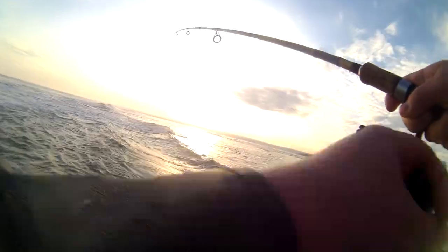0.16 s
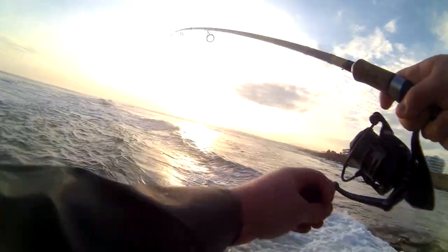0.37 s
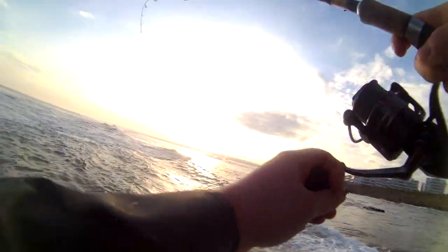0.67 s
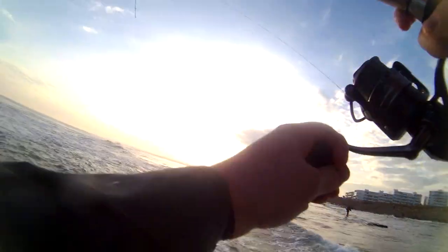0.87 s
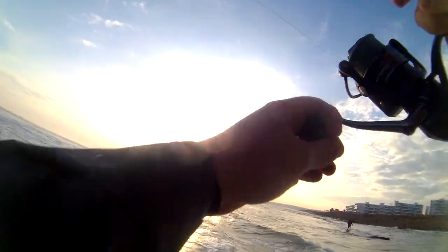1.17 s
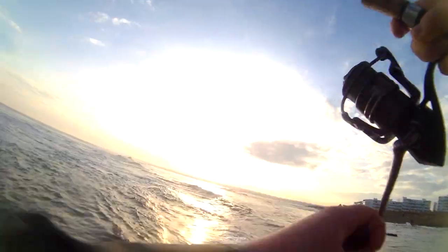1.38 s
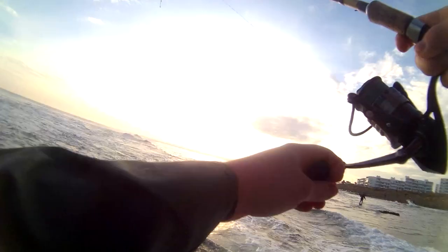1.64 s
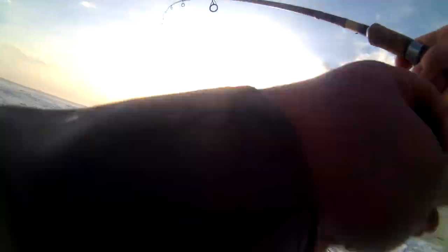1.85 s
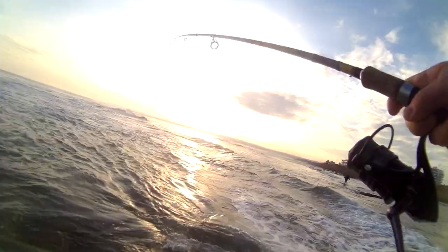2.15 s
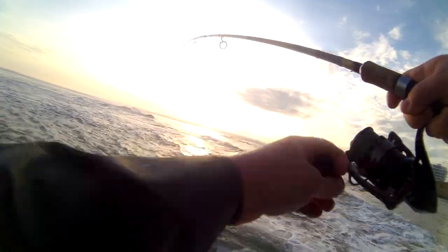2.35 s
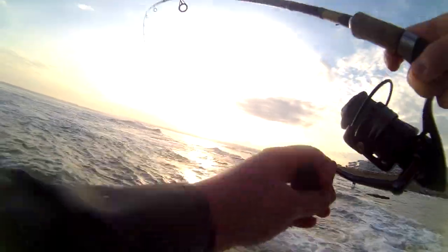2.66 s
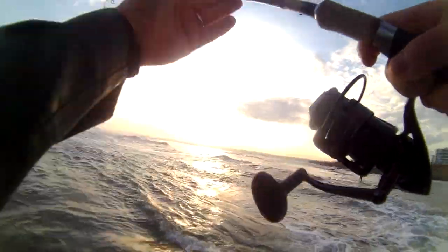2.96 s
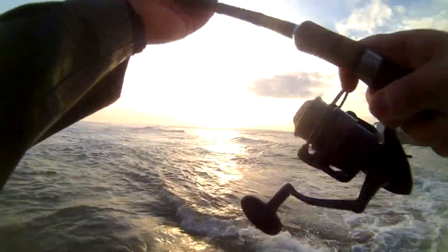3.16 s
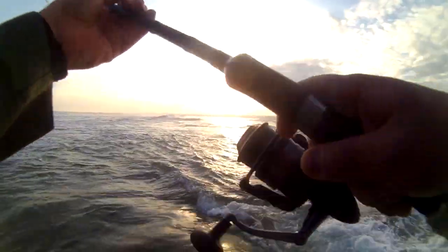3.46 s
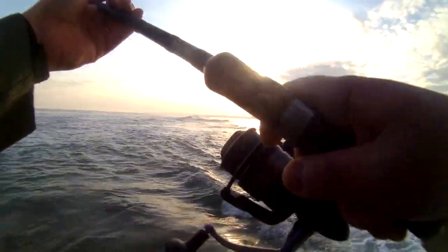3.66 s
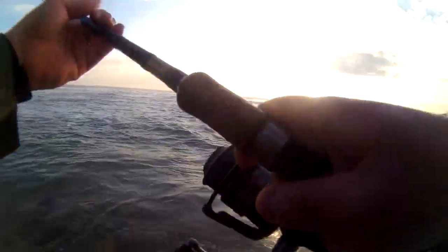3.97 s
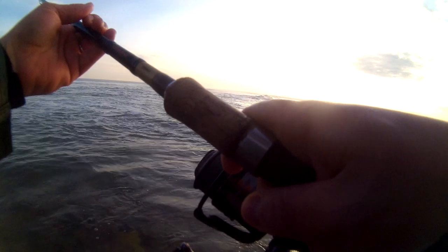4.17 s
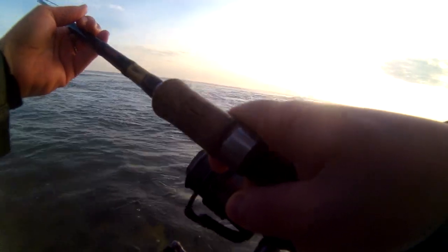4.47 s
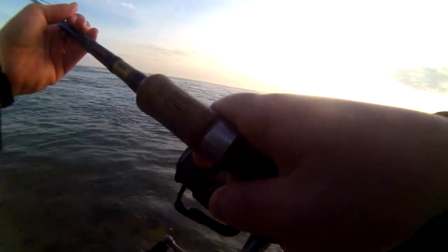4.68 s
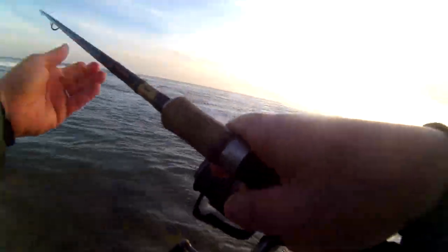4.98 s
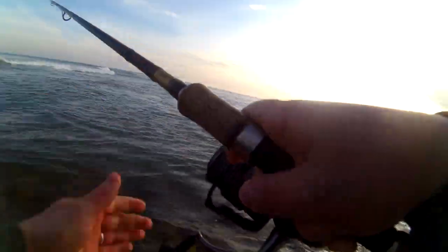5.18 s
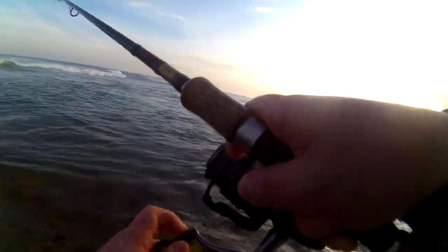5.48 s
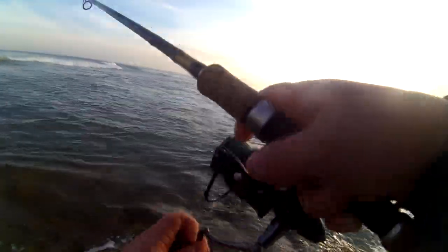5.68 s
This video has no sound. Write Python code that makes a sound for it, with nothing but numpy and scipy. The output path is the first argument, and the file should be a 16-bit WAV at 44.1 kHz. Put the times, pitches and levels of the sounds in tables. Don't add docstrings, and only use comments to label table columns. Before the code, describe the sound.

Surf washes continuously around an angler on the shore, heard from inside a small waterproof case that makes it hollow and midrange-heavy. Low wind bumps, small dull slaps and faint reel ticks come irregularly. The water thins around two seconds, swells again, then one very loud, short knock hits the case at 3.5 seconds and the sound dips briefly. The wash continues, weaker near five seconds. Soft hiss and a very faint high whine persist.

```python
import sys
import numpy as np
from scipy import signal
from scipy.fft import rfft, irfft, next_fast_len
from scipy.io import wavfile
from scipy.ndimage import uniform_filter1d, map_coordinates

SR = 44100
rng = np.random.default_rng(int(sys.argv[2]) if len(sys.argv) > 2 else 0)


def put_to_file(sound):
    columns = np.atleast_2d(sound).T
    safe = np.clip(columns, -1, 1)
    whole_steps = np.round(safe * 32767)
    wavfile.write(sys.argv[1], SR, whole_steps.astype(np.int16))


def volts(x):
    e = np.asarray(x, float) / 20
    return 10 ** e


N = 257544
T = np.arange(N) / SR

# time in seconds, strength in dB, foam in dB, nearness in dB.
WASH = [(0.0, -42, 8, -1), (0.2, -42.5, 9, -1), (0.28, -43.5, 5, -0.5), (0.8, -44, 2.5, -1.5),
        (1.1, -47.5, -2, 1.5), (1.4, -46, -0.5, 3.5), (1.72, -47.5, 4, 1), (1.78, -47.5, -4, -2),
        (1.95, -52.5, -3.5, -3), (2.3, -53.5, -8.5, -2.5), (2.55, -50, -5.5, -1), (2.92, -49, 1, 1.5),
        (3.2, -50, 1.5, 1), (3.44, -45.5, 2, -0.5), (3.9, -46, -0.5, -1), (4.6, -47, -1, -1),
        (5.3, -52, -5, 1), (5.84, -48.5, -3, 3.5)]
# time in seconds, swell in dB, foam in dB.
SLOPS = [(0.17, 4.5, -1), (0.52, 1, 0), (1.2, -1, 2), (2.14, 1.5, 5.5), (2.4, 1, 4), (2.68, 0, 6),
         (3.32, 0, 3), (3.83, 3, -2.5), (4.1, -2, -0.5), (4.24, 1, 1), (5.14, 1, -3), (5.65, 2, 2.5)]
# frequency in Hz, level in dB.
ROAR_SPECTRUM = [(40, -120), (90, -7.5), (200, -6), (400, -6), (700, -8.5), (1000, -20.5), (2500, -120)]
CHURN_SPECTRUM = [(300, -120), (600, -14.5), (850, -3), (1350, -5.5), (1800, -33.5), (4000, -120)]
SPLASH_SPECTRUM = [(800, -120), (1300, -14), (1600, -1.5), (2000, -4.5), (2400, -19.5), (5000, -120)]
SPRAY_SPECTRUM = [(1000, -120), (1800, -8.5), (2300, 0), (3200, -6.5), (4500, -17), (5500, -17.5),
                  (9000, -120)]
FIZZ_SPECTRUM = [(2500, -120), (4400, -22), (5600, -1.5), (7000, -1), (9000, -7.5), (11500, -12),
                 (15000, -42)]
# centre in Hz, width in Hz, height in dB.
SHELL = [(970, 180, 2), (1040, 117, 5.5), (1246, 58, 3.5), (1495, 370, 3), (1808, 290, 7.5),
         (3330, 300, -9.5), (3920, 800, 13.5), (5000, 460, -1), (7740, 310, -10)]
# frequency in Hz, level in dB.
WIND_SPECTRUM = [(8, -13.5), (20, -7), (40, -12.5), (80, -23), (160, -49), (400, -120)]
# time in seconds, peak in dB, length in seconds.
GUSTS = [(0.08, -43, 0.057), (0.202, -44, 0.05), (0.3, -56, .08), (0.46, -48, 0.13), (0.71, -54, .05),
         (0.835, -44, 0.11), (1.003, -55, .15), (1.113, -47, 0.066), (1.215, -44.5, .12),
         (1.376, -47.5, .15), (1.572, -46, .07), (1.683, -51, 0.044), (1.77, -46, 0.12),
         (1.973, -42.5, 0.074), (2.1, -62, 0.15), (2.34, -46.5, 0.093), (2.533, -50.5, 0.13),
         (2.705, -47, .08), (2.973, -48, .12), (3.086, -46, 0.058), (3.257, -52, .12), (3.45, -50, .07),
         (3.737, -49, 0.053), (3.837, -45, 0.048), (4.206, -52, .15), (4.6, -62, .2), (4.95, -53, 0.16),
         (5.33, -47.5, 0.12), (5.533, -51, .12), (5.73, -48, 0.19)]
# frequency in Hz, level in dB.
HISS_SPECTRUM = [(1500, -27), (3000, -6), (7000, -9), (9500, -8), (12000, -10.5), (14000, -10),
                 (16000, -9.5)]
# start in seconds, crack level in dB, ping level in dB.
TICKS = [(.518, -70, -46), (.833, -70, -48), (1.15, -62, -48), (1.4475, -48, -56), (1.729, -60, -52),
         (1.7815, -53, -52), (3.467, -58, -70), (3.548, -60, -48), (3.685, -70, -47), (3.76, -70, -52),
         (4.2248, -50, -62), (4.358, -57, -51), (4.417, -60, -48), (4.5, -58, -70), (5.4395, -58, -47),
         (5.681, -56, -70), (5.76, -62, -70)]
# frequency in Hz, level in dB.
REEL_SPECTRUM = [(1000, -40), (3000, -12), (5500, 4), (7000, 0), (10000, -16), (14000, -50)]
# start in seconds, peak in dB, pitch in Hz.
SLAPS = [(0.539, -27.5, 1040), (0.61, -29, 1064), (0.63, -27.5, 1060), (0.655, -42, 1080),
         (1.324, -33, 1280), (1.434, -29, 1040), (1.693, -31, 980), (2.355, -35, 926), (2.709, -30, 960),
         (2.923, -32.5, 975), (3.081, -37, 1040), (3.309, -27, 904), (3.329, -29.5, 1025),
         (3.368, -32, 1020), (3.795, -36, 970), (3.904, -28, 1040), (4.348, -31, 910), (4.37, -30, 880),
         (4.387, -33, 890), (4.499, -32, 830), (4.566, -33, 890), (4.602, -39, 1040), (4.705, -35, 1040),
         (5.392, -35, 1080), (5.505, -44, 2280), (5.64, -30, 894)]
WALL_HZ = [1063, 1254, 1750, 2040, 2870, 3930, 4750, 6200, 7280]
# level in dB, 60 dB decay in seconds.
WALL_DECAY = [(-4.5, 0.016), (-5.5, 0.0095), (-20, 0.02), (-33, 0.027), (-24, 0.0095), (-23, 0.018),
              (-23.5, 0.0063), (-22.5, 0.0047), (-34.5, 0.01)]
WALL_SIGN = [1, -1, 1, -1, 1, -1, 1, 1, -1]
# pitch in Hz, level in dB, 60 dB decay in seconds.
BODY = [(47, -26, 0.093), (231, -5.5, 0.025), (453, -17.5, 0.023), (662, -12.5, 0.015)]
# start in seconds, end in seconds, gain in dB.
DUCK = (3.524, 3.679, -5)

MEAN_STRENGTH_DB = -48
PORT_HZ = 3930


def unit(x):
    return x / np.sqrt(np.mean(x ** 2) + 1e-20)


def curves(rows):
    s, *columns = np.transpose(rows)
    return [np.interp(T, s, column) for column in columns]


def wobble(rate_hz):
    knots = rng.standard_normal(int(N * rate_hz / SR) + 4)
    return map_coordinates(knots, [T * rate_hz])


def bumps(s, size, rise_s, fall_s):
    clock = T[::100]
    late = clock - np.c_[s]
    width_s = np.where(late < 0, np.c_[rise_s], np.c_[fall_s])
    bells = np.c_[size] * np.exp(-(late / width_s) ** 2)
    return np.interp(T, clock, np.sum(bells, axis=0))


def coloured(x, spectrum, shell=SHELL):
    m = 2 * next_fast_len(N // 2 + 4096)
    hz = np.fft.rfftfreq(m, 1 / SR)
    point_hz, point_db = np.transpose(spectrum)
    source_db = np.interp(np.log(hz + 1), np.log(point_hz), point_db)
    shell_db = sum(db / (1 + (2 * (hz - centre) / width) ** 2) for centre, width, db in shell)
    cepstrum = irfft(np.log(volts(source_db + shell_db)), m)
    cepstrum[1:m // 2] *= 2
    cepstrum[m // 2 + 1:] = 0
    return irfft(rfft(x, m) * np.exp(rfft(cepstrum)), m)[:N]


def patchy(patch_db, burst_db, burst_hz):
    z = signal.stft(rng.standard_normal(N + 512), nperseg=512)[2]
    field = uniform_filter1d(rng.standard_normal(z.shape), size=6, axis=0)
    field = uniform_filter1d(field, size=10, axis=1)
    noise = signal.istft(z * volts(patch_db * unit(field)), nperseg=512)[1][:N]
    return noise * volts(burst_db * wobble(burst_hz))


def ring(modes, length_s, attack_s):
    t = np.arange(round(length_s * SR)) / SR
    tones = sum(volts(db - 60 * t / t60) * np.sin(2 * np.pi * hz * t) for hz, db, t60 in modes)
    return tones * (1 - np.exp(-t / attack_s))


def add(track, s, sound):
    track[round(s * SR):][:len(sound)] += sound


def surf():
    strength_db, foam_db, near_db = curves(WASH)
    s, swell_db, froth_db = np.transpose(SLOPS)
    slop_s = [0.053]
    strength_db = strength_db - MEAN_STRENGTH_DB + bumps(s, swell_db, slop_s, slop_s)
    foam_db = foam_db + bumps(s, froth_db, slop_s, slop_s)
    tumble = volts(0.32 * wobble(15) + 0.44 * wobble(40))
    drops = unit((rng.random(N) < 700 / SR) * rng.standard_normal(N))

    def level(mean_db, per_strength, per_foam):
        return volts(mean_db + per_strength * strength_db + per_foam * foam_db)

    def water(noise, drop_share, spectrum):
        return unit(coloured(noise + drop_share * drops, spectrum))

    far_fade = volts(-0.56 * (T - T.mean()))
    roar = level(-50.5, 0.3, 0.085) * far_fade * water(patchy(0.88, 0.31, 14), 0.28, ROAR_SPECTRUM)
    churn = level(MEAN_STRENGTH_DB + 0.75, 1, 0) * water(patchy(0.38, 0.28, 15), 0.28, CHURN_SPECTRUM)
    splash = level(-52.5, 0.078, 0.65) * water(patchy(0.71, 0.45, 25), 0.48, SPLASH_SPECTRUM)
    splash = splash * volts(near_db)
    spray = level(-56.5, 0.77, 0.18) * water(patchy(0.94, 0.49, 24.82), 0.44, SPRAY_SPECTRUM)
    spray = spray * volts(0.3 * near_db)
    fizz = level(-65.5, 0.05, 1) * water(patchy(1.0, 0.72, 30), 0.34, FIZZ_SPECTRUM)
    return tumble * (roar + churn + splash + spray + fizz)


def wind():
    calm_db, rise_over_fall = -63, 0.78
    push = coloured(rng.standard_normal(N), WIND_SPECTRUM, shell=[])
    power = np.abs(uniform_filter1d(push ** 2, size=3500))
    even = push / np.sqrt(power + 0.11 * np.mean(push ** 2))
    s, peak_db, length_s = np.transpose(GUSTS)
    gusts = bumps(s, volts(peak_db), rise_over_fall * length_s / 2, length_s / 2)
    return (volts(calm_db) + gusts) * unit(even)


def hiss():
    return volts(-62.5) * unit(coloured(rng.standard_normal(N), HISS_SPECTRUM, shell=[]))


def whine():
    whine_hz, chop_hz, chop_turn, pilot_hz = 10020.205, 38.244, 0.162, 14992.07
    chop = np.tanh(5 * np.cos(2 * np.pi * (chop_hz * T - chop_turn)))
    tone = (volts(-72) + volts(-64.4) * chop) * np.sin(2 * np.pi * whine_hz * T)
    return tone + volts(-86.5) * np.sin(2 * np.pi * pilot_hz * T)


def reel():
    cracks, pings, t = np.zeros(N), np.zeros(N), T[:600]
    for s, crack_db, ping_db in TICKS:
        crack = volts(crack_db + 10.5 - 60 * t / 0.01) * rng.choice([-1, 1], len(t))
        add(cracks, s, crack)
        add(pings, s, volts(ping_db + 5) * ring([(PORT_HZ, 0, 0.018)], 0.03, 0.0005))
    return pings + coloured(cracks, REEL_SPECTRUM, shell=[])


def slaps():
    track = np.zeros(N)
    for s, db, hz in SLAPS:
        modes = [(hz, 0, 0.03), (1.7 * hz, -8, 0.02)]
        add(track, s, volts(db - 1.0) * ring(modes, 0.04, 0.00089))
    return track


def knock():
    knock_s, body_lag_s, port_lag_s, scrape_lag_s = 3.5069, 0.0012, 0.0017, 0.0004
    track = np.zeros(N)
    for hz, (db, t60_s), sign in zip(WALL_HZ, WALL_DECAY, WALL_SIGN):
        add(track, knock_s, -sign * volts(5.5) * ring([(hz, db, t60_s)], 0.1, 0.00032))
    add(track, knock_s + body_lag_s, -volts(3.5) * ring(BODY, 0.15, 0.00039))
    add(track, knock_s + port_lag_s, volts(-13) * ring([(PORT_HZ, 0, 0.007)], 0.03, 0.0007))
    scrape = volts(-35 - 60 * T[:900] / 0.007) * rng.standard_normal(900)
    add(track, knock_s + scrape_lag_s, scrape)
    return track


def scene():
    return (surf() + wind() + reel() + slaps() + knock())[None]


def top_cut(x):
    return signal.sosfilt(signal.butter(12, 16600, fs=SR, output="sos"), x)


def record(dry):
    ceiling, top_hz = 0.71, 15740
    start_s, end_s, duck_db = DUCK
    ducked = uniform_filter1d(1.0 * (T > start_s) * (T < end_s), size=500)
    mix = (dry + hiss() + whine()) * volts(duck_db * ducked)
    mix = mix / (1 + np.abs(mix / ceiling) ** 12) ** (1 / 12)
    mix = irfft(rfft(mix) * (np.fft.rfftfreq(N, 1 / SR) < top_hz), N)
    return top_cut(mix)


dry = scene()
out = record(dry)
put_to_file(out)
```